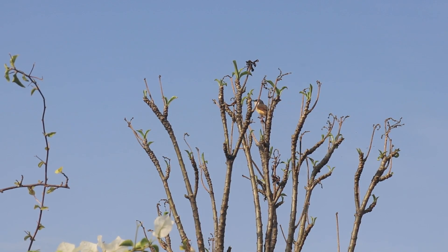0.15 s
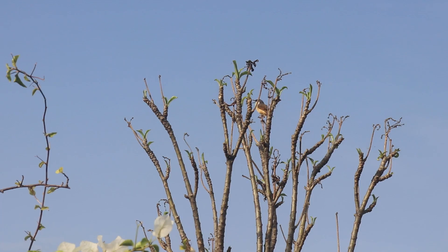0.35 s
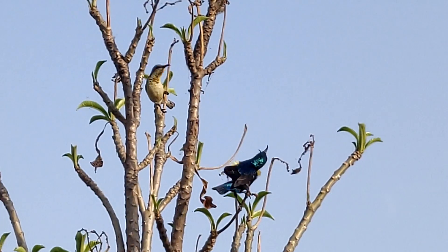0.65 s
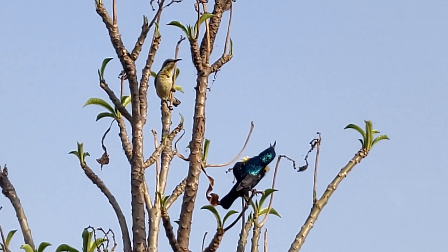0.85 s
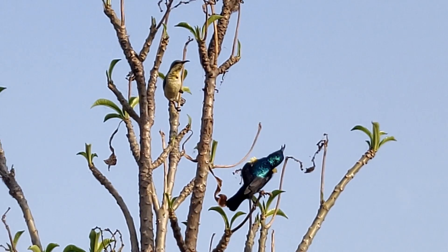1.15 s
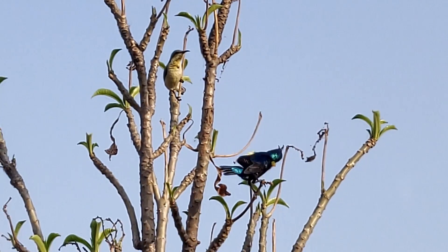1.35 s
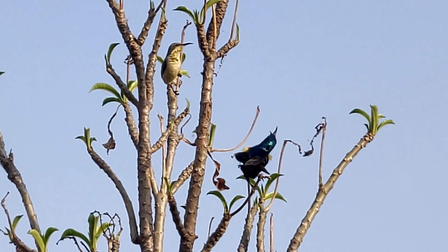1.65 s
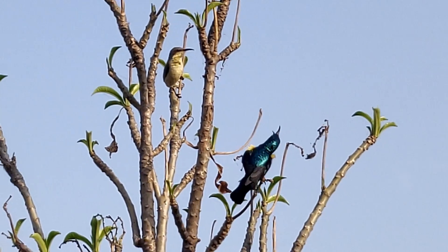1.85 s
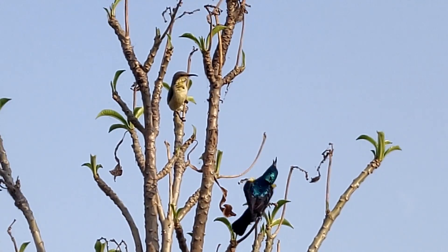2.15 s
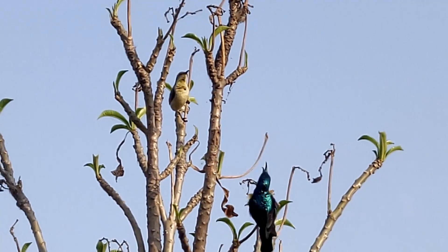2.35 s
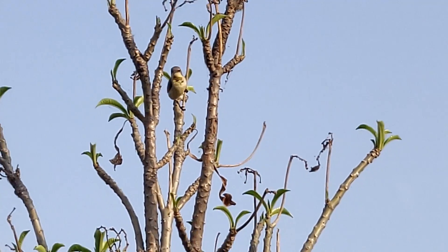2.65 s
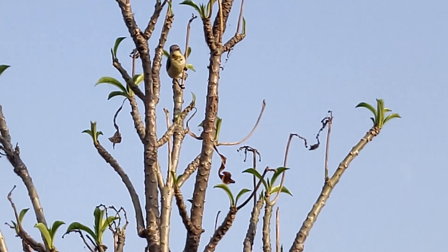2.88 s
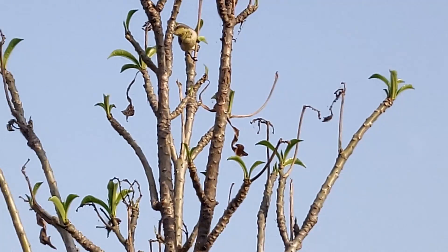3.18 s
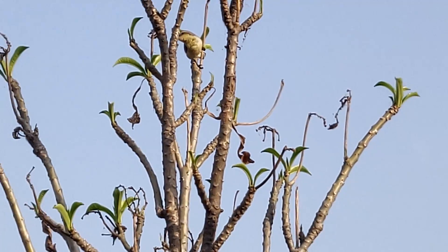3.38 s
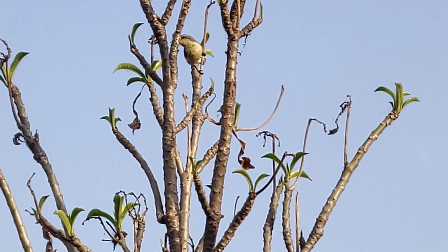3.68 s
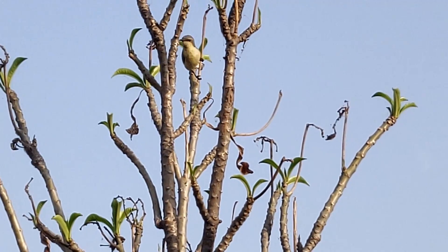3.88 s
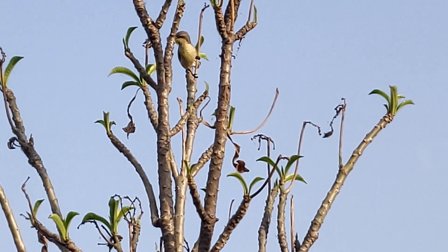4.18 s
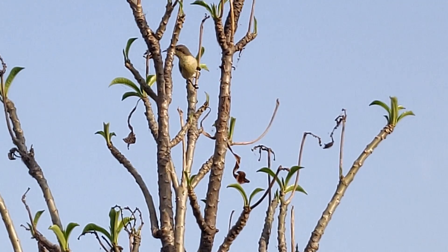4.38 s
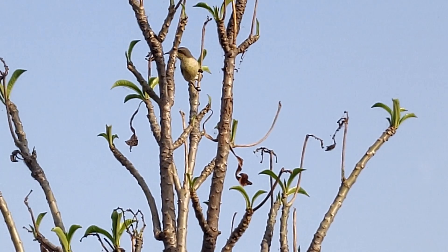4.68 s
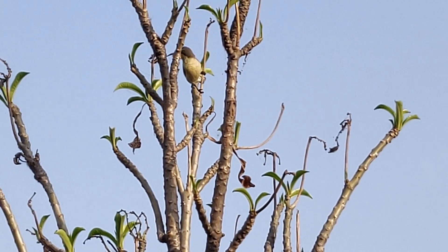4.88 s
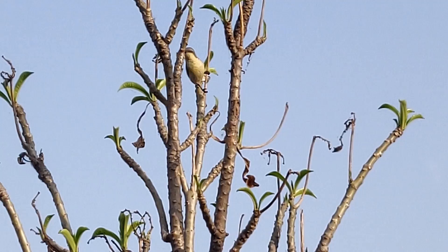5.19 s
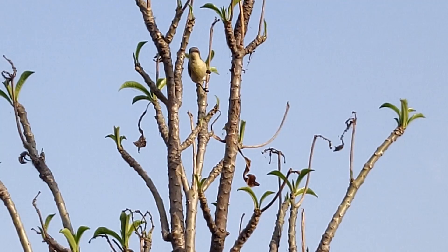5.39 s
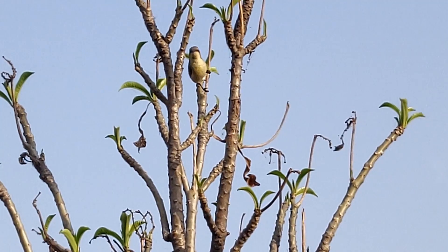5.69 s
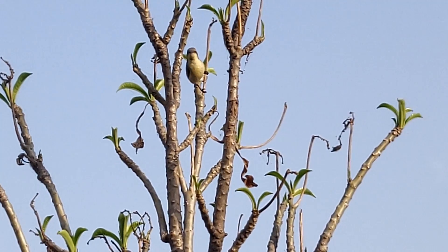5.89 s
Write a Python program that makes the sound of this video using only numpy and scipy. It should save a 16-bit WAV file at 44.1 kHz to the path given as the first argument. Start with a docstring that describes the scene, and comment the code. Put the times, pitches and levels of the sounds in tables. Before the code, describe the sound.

Outdoor garden birdsong: quick high chirps, slurs and buzzy trills up close, a faint distant passage with a brief rustle, then close phrases again.

```python
"""Sunbirds sing in a garden. Close by, stepped phrases start first, then slowing runs of ticks, slurs, chips and trills.
From about 2.5 s the song comes from further off to the left, and near 3.7 s something rustles briefly.
From 4.9 s stepped phrases return close by. Each note is one gliding whistle, thrown back by walls and foliage.
Under it all a distant engine hums, wind rumbles on the microphone, traffic drones and leaves hiss: all shaped
noise, except the engine, which is a stack of tones."""
import sys
import numpy as np
from scipy import signal
from scipy.fft import rfft, irfft, next_fast_len
from scipy.io import wavfile
from scipy.ndimage import uniform_filter1d, minimum_filter1d

SR = 44100
rng = np.random.default_rng(int(sys.argv[2]) if len(sys.argv) > 2 else 0)


def file_out(sig):
    """Save sig as 16-bit WAV at sys.argv[1]."""
    # one column per channel
    cols = np.atleast_2d(sig).T
    # limit, then scale
    lim = np.clip(cols, -1, 1)
    pcm = np.round(lim * 32767).astype(np.int16)
    wavfile.write(sys.argv[1], SR, pcm)


N = 266099
TIME = np.arange(N) / SR  # seconds


def undb(db):
    """Turn decibels into gain."""
    return 10 ** (np.asarray(db) / 20)


def curves(table, t):
    """Join each column of a table by straight lines over the times t."""
    s, *columns = np.transpose(table)
    return [np.interp(t, np.sort(s), c) for c in columns]


def colour(x, points):
    """Make some pitches louder and others softer, following (Hz, dB) points on a log-frequency axis."""
    size = next_fast_len(x.shape[-1])
    hz, db = np.transpose(points)
    f = np.maximum(np.arange(size // 2 + 1) * SR / size, 1)
    gain = undb(np.interp(np.log(f), np.log(hz), db))
    return irfft(rfft(x, size) * gain, size)[..., :x.shape[-1]]


def walk(rate, count):
    """Wander slowly by chance: random levels, each held 1 / rate seconds, then smoothed twice."""
    hold = max(int(SR / rate), 1)
    held = np.repeat(rng.standard_normal(count // hold + 1), hold)
    smooth = uniform_filter1d(uniform_filter1d(held, hold), hold)
    return smooth[:count] * np.sqrt(2)


def noise(points, likeness):
    """Make coloured stereo noise of rms 1; likeness is the correlation of left and right."""
    mid, side = colour(rng.standard_normal((2, N)), points)
    c = np.clip(likeness, -1, 1)
    pair = np.sqrt(1 + c) * mid + np.sqrt(1 - c) * np.array([side, -side])
    return pair / pair.std()


# Steady background layers, by name. Each: level at 0 s in dB, growth in dB per s,
# dB lower before the background fades in.
BACKGROUND_LEVELS = {"wind": (-40, .35, 28.7), "hiss": (-47.5, 0.335, 12), "drone": (-51, 0.858, 2.5)}
FADE_IN_S, FADE_IN_WIDTH_S = 0.261, 0.042  # middle of the fade-in, and how gradual it is


def bed_db(name):
    """Level of a background layer: hushed at first, then faded in and slowly growing."""
    db, db_per_s, hush_db = BACKGROUND_LEVELS[name]
    hush = (1 - np.tanh((TIME - FADE_IN_S) / FADE_IN_WIDTH_S)) / 2
    return db + db_per_s * TIME - hush_db * hush


# Tone of the wind on the microphone. Each row: frequency in Hz, level in dB.
WIND_COLOUR = [(12, -4), (22, 2), (45, -4), (70, -5.5), (110, -17), (200, -24.5), (400, -36.5), (900, -72)]
# Gusts on the microphone. Each row: centre in seconds, half length in seconds, boost in dB.
WIND_GUSTS = [(3.1, .3, 0.5), (4.3, 0.2625, 3), (5.88, 0.28, 8.5)]
# Tone of the far murmur. Each row: frequency in Hz, level in dB.
MURMUR_COLOUR = [(180, -41), (300, -7.5), (328, -2.5), (366, -8), (464, -3.5), (689, -2), (754, -1),
                 (892, -5.5), (1080, -7), (1370, -6), (1700, -0.5), (1970, -7), (2450, -6), (2990, -15),
                 (3200, -23), (4160, -43.5), (7040, -120)]
# How loud the murmur is. Each row: time in seconds, level in dB.
MURMUR_LOUDNESS = [(0, -58), (.5, -49.5), (2.45, -46), (3.3, -46.5), (5.2, -45.5), (6.03, -45)]
# Tone of the leaf hiss. Each row: frequency in Hz, level in dB.
LEAF_HISS_COLOUR = [(2000, -29), (3200, -6), (4200, -0.5), (5500, 1), (6400, 2.5), (7400, -9.5),
                    (8800, -15), (10000, -33), (13000, -31), (15500, -26)]
# Tone of the traffic drone. Each row: frequency in Hz, level in dB.
TRAFFIC_COLOUR = [(60, -21.5), (110, -1), (160, -0.5), (230, -7.5), (300, -10.5), (600, -13), (1200, -44.5)]


def outdoors(buffet_db=4.5, wind_pan_db=-3.0):
    """Low wind noise differs from side to side, traffic drones in the middle, murmur and leaf hiss lie all round."""
    gusts_db = sum(db * np.exp(-((TIME - s) / half_s) ** 2) for s, half_s, db in WIND_GUSTS)
    wind_db = bed_db("wind") + gusts_db + buffet_db * walk(12, N)
    wind = noise(WIND_COLOUR, 0.16) * undb(wind_db) * undb([[wind_pan_db], [-wind_pan_db]])
    murmur_db, = curves(MURMUR_LOUDNESS, TIME)
    murmur = noise(MURMUR_COLOUR, 0.037) * undb(murmur_db + 1.03 * walk(10, N))
    hiss = noise(LEAF_HISS_COLOUR, 0) * undb(bed_db("hiss") + 2.1 * walk(8.02, N))
    drone = noise(TRAFFIC_COLOUR, 0.937) * undb(bed_db("drone") + 1.125 * walk(15, N))
    return wind + murmur + hiss + drone


# Speed of the engine. Each row: time in seconds, cycle rate in Hz.
ENGINE_CYCLES = [(0, 18.05), (2.2, 21.27), (3.8, 21.14), (4.45, 16.9), (6.03, 16.3)]
# Loudness of the engine. Each row: time in seconds, level in dB, firing tone above the rest in dB.
ENGINE_LOUDNESS = [(0, -69, 4.5), (1.2, -56, 10.5), (2.1, -59.5, 8), (2.45, -49.5, 11.5), (3.3, -51.5, 5),
                   (3.75, -53.5, 13.5), (4.4, -47.5, 4), (6.03, -43.5, 3.5)]
# Tone of the exhaust. Each row: frequency in Hz, level in dB.
EXHAUST_COLOUR = [(60, -6.5), (85, 0.5), (135, 0.5), (165, -6), (200, -4.5), (228, -1.5), (260, -15),
                  (330, -19)]


def engine(waver=0.00547, swell_db=1.5, order=5, count=15):
    """A far engine: multiples of its cycle rate throb through the exhaust, with the firing tone on top."""
    hz, = curves(ENGINE_CYCLES, TIME)
    db, firing_db = curves(ENGINE_LOUDNESS, TIME)
    phase = 2 * np.pi * np.cumsum(hz * (1 + waver * walk(14, N))) / SR
    tones = 0
    for k in range(order - 1, count):
        tone_db = firing_db * (k == order) + swell_db * walk(12, N)
        tones = tones + undb(tone_db) * np.cos(k * phase + rng.uniform(0, np.pi))
    return undb(db) * colour(tones, EXHAUST_COLOUR)


def bursts(table):
    """Add up bursts that grow to a peak and die away exponentially."""
    total = 0
    for s, attack_s, decay_s, db in table:
        away = np.maximum((s - TIME) / attack_s, (TIME - s) / decay_s)
        total = total + undb(db) * np.exp(-away)
    return total


# Scrapes of the rustle. Each row: peak in seconds, attack in seconds, decay in seconds, level in dB.
SCRAPE_BURSTS = [(3.712, 0.00136, 0.0045, -35), (3.73, 0.015, 0.102, -41.5), (3.99, 0.103, 0.137, -38)]
# Tone of the scrapes. Each row: frequency in Hz, level in dB.
SCRAPE_TONE = [(300, 7.5), (600, 2.5), (1200, 0), (1800, 6.5), (2500, -3.5), (3500, -4.5), (9000, -16),
               (15000, -73)]
# The soft thud. Each row: peak in seconds, attack in seconds, decay in seconds, level in dB.
THUD_BURSTS = [(4.07, 0.093, 0.186, -39)]
# Tone of the thud. Each row: frequency in Hz, level in dB.
THUD_TONE = [(100, -10), (200, -0.5), (300, 11.5), (450, -6.5), (900, -7.5), (2000, -44.5)]


def rustle(flicker_db=3):
    """A fluttering scrape of noise starts abruptly and ends in a soft, lower thud."""
    scrape = noise(SCRAPE_TONE, 0.037) * bursts(SCRAPE_BURSTS) * undb(flicker_db * walk(70, N))
    thud = noise(THUD_TONE, 0.736) * bursts(THUD_BURSTS) * undb(flicker_db * walk(40, N))
    return scrape + thud


def scatter(t60, start_s):
    """A dying cloud of reflections with unit energy, different on each side; it falls 60 dB in t60 seconds."""
    age = np.arange(SR) / SR - start_s
    cloud = rng.standard_normal((2, SR)) * (age > 0) * np.exp(-np.log(1000) * np.abs(age) / t60)
    return cloud / np.sqrt(np.sum(cloud ** 2, axis=1, keepdims=True))


# Reflections from walls and boughs. Each row: delay in seconds, then left and right level in dB,
# before the echo level of the place is added.
WALL_ECHOES = [(.0029, -8, -9.5), (.0068, -13.5, -7), (0.0132, -15.5, -30.5), (.044, -8, -16.5)]
GARDEN_T60_S, FOLIAGE_T60_S = 0.54, 0.119


def garden(foliage_db, tail_db, echo_db, right_lag_s, left_wet_db=0.5, smear_s=0.022):
    """Stereo response: direct sound, a few smeared echoes, quick scatter from foliage and a longer tail."""
    foliage = undb(foliage_db) * scatter(FOLIAGE_T60_S, 0.0045)
    tail = undb(tail_db) * scatter(GARDEN_T60_S, 0.01)
    response = (foliage + tail) * undb([[left_wet_db], [-left_wet_db]])
    for delay_s, left_db, right_db in WALL_ECHOES:
        response += undb([[left_db + echo_db], [right_db + echo_db]]) * scatter(smear_s, delay_s)
    # the direct sound reaches one side a little later
    for channel, lag_s in enumerate((max(-right_lag_s, 0), max(right_lag_s, 0))):
        response[channel, int(lag_s * SR)] += 1
    return response


SECOND_DB, THIRD_DB = -42.5, -36  # overtones of the whistle, before the edge below
# Harder or softer edge of some notes, by name: overtone change in dB.
NOTE_EDGE = {"rise": -1, "steps": -15, "slur": -5, "chip": 1.5, "trill": 3.5, "tick": -2}


def whistle(hz, strength, kind, waver=0.00615, flutter_db=1.59, rasp=0.66):
    """One note: a nearly pure tone with a slight tremble, under faint raspy overtones."""
    count = len(hz)
    hz = uniform_filter1d(hz, size=40) * (1 + waver * walk(500, count))
    phase = 2 * np.pi * np.cumsum(hz) / SR
    rough = phase + rasp * walk(600, count)
    second = undb(SECOND_DB) * np.sin(phase + rough)
    third = undb(THIRD_DB) * np.sin(phase + 2 * rough)
    third = third * np.clip((SR / 2 - 3 * hz) / 2000, 0, 1)  # fades out before it is too high to sample
    tone = np.sin(phase) + undb(NOTE_EDGE.get(kind, 0)) * (second + third)
    to_nearest_end = np.minimum(np.arange(count), np.arange(count)[::-1]) / SR
    ends = np.minimum(to_nearest_end / 0.0011, 1)
    flutter = undb(flutter_db * walk(270.9, count))
    return np.sqrt(2) * tone * ends * uniform_filter1d(strength, size=55) * flutter


FADE_POWER = 0.3685  # steepness of the fall in level


def hump(u, peak, swell_power):
    """Level that swells from nothing to 1 at the share peak of a sound and dies away again."""
    peak = np.clip(peak, .05, .95)
    swell, fade = np.sin(np.pi / 2 * np.minimum([u / peak, (1 - u) / (1 - peak)], 1))
    return swell ** swell_power * fade ** FADE_POWER


def progress(length_s):
    """Count from 0 to 1 over a length of time."""
    return np.linspace(0, 1, int(length_s * SR))


# Notes by name, one to three glides in a row, before a run's own length, pitch and level.
# Each row: length in seconds, from Hz, to Hz, bow at the middle in Hz, level in dB, loudest at (0-1).
NOTE_GLIDES = { "slur": [(.06, 3153, 4511, 470.6, -2, 0.65)], "chip": [(.029, 5400, 6970, 384.5, 0, 0.32),
               (.02, 6600, 4000, -650, -13.5, 0)], "tick": [(0.025, 4130, 4700, -61, -11, 0.65),
               (.013, 4926, 6950, 298, 0.5, 0.41), (0.0033, 6900, 4600, 2, 1, 0)],
               "flick": [(0.02, 5100, 6150, 200, 3, 0.52), (.017, 7300, 5500, -4.5, -2.5, 0.2)],
               "pip": [(.013, 5710, 6482, 0.012, 3, 0)], "lead": [(.028, 3740, 5402, 200, -3.5, 0.41)],
               "rise": [(.118, 4106, 5707, -110, -5, 0.83)], "soar": [(.11, 3878, 6120, -130, 0, 0.69)],
               "sweep": [(.085, 3978, 5185, 109, -0.5, 0.99)], "dip": [(.065, 4750, 3700, -220, -2, 0.08),
               (.075, 3700, 5100, -200, -2.5, 0.37), (.09, 5017, 5350, 180.5, 3, .08)],
               "fall": [(.21, 5047, 4183, -30.5, 5.5, 0)], }
SWELL_POWER = 1.057  # steepness of a glide's rise in level


def glides(kind, length):
    """Pitch and strength of a note made of bowed glides."""
    parts = []
    for length_s, from_hz, to_hz, bow_hz, db, peak in NOTE_GLIDES[kind]:
        u = progress(length_s * length)
        hz = from_hz + (to_hz - from_hz) * u + bow_hz * (1 - (2 * u - 1) ** 2)
        parts.append([hz, undb(db) * hump(u, peak, SWELL_POWER)])
    return np.hstack(parts)


# a trill arches up to a crest and drops away (before a run's length and pitch factors)
TRILL_FROM_HZ, TRILL_CREST_HZ, TRILL_END_HZ = 5600, 7026, 3700
TRILL_RISE_S, TRILL_FALL_S, TRILL_DROP_POWER = .07, .042, 2.7
TRILL_ATTACK_S, TRILL_RELEASE_S = 0.02385, 0.01717
# a warble shakes it on the way up; WARBLE_RISE is the share of each shake spent rising
WARBLE_HZ, WARBLE_SWING_HZ, WARBLE_START_S, WARBLE_RISE = 82.24, 957, .0005, .22


def trill(length, throb_db=4.5):
    """Pitch and strength of a trill: pitch jumps up and slides back, less towards the crest, weaker in troughs."""
    total_s = TRILL_RISE_S + TRILL_FALL_S
    t = progress(total_s * length) * total_s
    below = np.maximum(1 - t / TRILL_RISE_S, 0)
    past = np.maximum(t - TRILL_RISE_S, 0) / TRILL_FALL_S
    climb = (TRILL_CREST_HZ - TRILL_FROM_HZ) * below
    drop = (TRILL_CREST_HZ - TRILL_END_HZ) * past ** TRILL_DROP_POWER
    arch = TRILL_CREST_HZ - climb - drop
    shake = signal.sawtooth(2 * np.pi * WARBLE_HZ * (t - WARBLE_START_S), np.clip(WARBLE_RISE, 0, 1))
    warble = np.sqrt(below) * shake
    ends = np.minimum(t / TRILL_ATTACK_S, 1) * np.minimum((total_s - t) / TRILL_RELEASE_S, 1) ** 2
    return arch + WARBLE_SWING_HZ * warble, ends * undb(throb_db * warble)


SLOWING = 1.023  # each gap in a run is this many times the last
NOTE_SCATTER = .006  # no two notes have quite the same pitch (share)


def run_of(s, kind, repeats, gap_s, length, pitch, first_db, last_db, pan_db):
    """One note repeated, slowing a little and changing evenly in level: (s, sound, pan dB) for each."""
    notes = []
    for k, db in enumerate(np.linspace(first_db, last_db, round(repeats))):
        hz, strength = trill(length) if kind == "trill" else glides(kind, length)
        hz = hz * pitch * (1 + NOTE_SCATTER * rng.standard_normal())
        notes.append((s, whistle(hz, strength * undb(db), kind), pan_db))
        s = s + gap_s * SLOWING ** k
    return notes


# Syllables of the stepped phrase, climbing and coming down. Each row: seconds from the phrase's start,
# length in seconds, pitch in Hz, sag at the end in Hz, level in dB added to the phrase's, loudest at (0-1).
PHRASE_SYLLABLES = [(.002, 0.0379, 3664, -110, -9, 0.71), (0.038, 0.0202, 4345, 542.5, -5, 0.78),
                    (0.061, 0.014, 4990, 601, -4.5, 0.69), (0.077, .021, 5468, 449, 2, 0.82),
                    (0.101, 0.0251, 4500, 647.5, 1, 0.33), (0.128, 0.037, 3943, 656.5, -2, 0.34)]
STEP_SAG_POWER, STEP_SWELL_POWER = 3, 2.125  # the syllables swell more suddenly than the glides
PHRASE_PAN_DB = -3.5  # left minus right


def stepped_phrase(s, db):
    """Short syllables up and down a ladder of pitches, each swelling and sagging: (s, sound, pan dB) for each."""
    notes = []
    for after_s, length_s, hz, sag_hz, step_db, peak in PHRASE_SYLLABLES:
        u = progress(length_s)
        strength = undb(db + step_db) * hump(u, peak, STEP_SWELL_POWER)
        sound = whistle(hz - sag_hz * u ** STEP_SAG_POWER, strength, "steps")
        notes.append((s + after_s, sound, PHRASE_PAN_DB))
    return notes


LEAD = SR // 4  # samples of room for notes that begin before 0 s


def song(runs, response):
    """Place runs of notes in time and let one place in the garden echo them."""
    out = np.zeros((2, LEAD + N + SR))
    for s, note, pan_db in sum(runs, []):
        start = max(LEAD + int(s * SR), 0)
        out[:, start:start + len(note)] += undb([[pan_db / 2], [-pan_db / 2]]) * note
    return signal.fftconvolve(out, response, axes=1)[:, LEAD:LEAD + N]


# Runs of one note from close by. Each row: start in seconds, note name, repeats, first gap in seconds,
# length factor, pitch factor, first level in dB, last level in dB, left minus right in dB.
CLOSE_RUNS = [ (0.124, "tick", 2, .097, 1, 1, -25, -18.5, -7),
              (.320, "tick", 2, 0.0979, 1, 1.0026, -12.5, -12, -6),
              (.511, "slur", 4, 0.1694, 1, 1.027, -19.5, -18, -2.5),
              (1.21, "slur", 1, 0, 1.06, 1.045, -17.5, -20, -1.5),
              (.599, "chip", 4, 0.1716, 1, 1.0417, -12, -11.5, -2),
              (1.325, "pip", 3, .19, 1.2, 1.076, -29, -17.5, -8.5),
              (1.347, "trill", 3, 0.19183, 1.03, 0.9978, -12.5, -15, -2.5),
              (1.513, "lead", 3, 0.22, 1, 1, -30, -25, -2),
              (1.926, "lead", 1, 0, 1.4, 0.926, -36, -30, 1.5),
              (1.931, "pip", 2, 0.019, 1.2, .99, -22.5, -25.5, -6.5),
              (1.973, "rise", 1, 0.033, 1.087, 1, -14.5, -16, -3)]
# Stepped phrases close by. Each row: start in seconds, level in dB.
STEPPED_PHRASES = [(-.18, -17.5), (.084, -18), (.356, -19), (4.906, -20), (5.172, -18.5), (5.433, -18.5),
                   (5.696, -18)]
# Runs from further off to the left. Each row: start in seconds, note name, repeats, first gap in seconds,
# length factor, pitch factor, first level in dB, last level in dB.
DISTANT_RUNS = [ (2.491, "fall", 1, 0, 0.91, 1.018, -58, -51),
                (2.87, "tick", 2, .452, .95, 0.875, -37.5, -49.5),
                (3.111, "dip", 1, 0, 0.91, 0.992, -47, -44.5),
                (3.418, "fall", 2, 0.082, .25, .94, -53.5, -59.5),
                (3.561, "lead", 1, 0.0091, 1.8, 1.17, -36.5, -38.5), (3.612, "soar", 1, 0, 1, 1, -32, -38),
                (3.796, "lead", 2, .197, 2.6, 1.1, -34, -32),
                (3.82, "trill", 2, .199, 1.02, 0.969, -29.5, -29.5),
                (4.176, "flick", 2, 0.1691, 1, 1, -31, -31),
                (4.224, "sweep", 2, 0.163, 0.89, 0.992, -30, -29),
                (4.528, "tick", 2, 0.1068, 1, 0.946, -33.5, -30),
                (4.75, "tick", 1, 0.098, 1, 0.892, -35, -33)]
FAR_PAN_DB = 2.5  # left minus right
# How the left side hears the birds. Each row: frequency in Hz, level in dB.
LEFT_HEARING = [(3000, -7), (4500, 2.5), (5400, 1), (6300, 8), (7200, -4), (8500, 16.5), (11000, -15.5),
                (13500, -1.5), (16000, -3.5)]
# How the right side hears the birds. Each row: frequency in Hz, level in dB.
RIGHT_HEARING = [(3000, -6.5), (4500, -1.5), (5400, -6.5), (6300, -13), (7200, -5.5), (8500, 22.5),
                 (11000, -8.5), (13500, -5.5), (16000, 9)]


def birds():
    """Near and far song; the far one has a stronger tail and echoes and reaches the left side first."""
    close = garden(foliage_db=-4, tail_db=-10, echo_db=-5.0, right_lag_s=-.00003)
    distant = garden(foliage_db=-8.5, tail_db=-5, echo_db=-1.5, right_lag_s=.00048)
    close_runs = [run_of(*row) for row in CLOSE_RUNS]
    phrases = [stepped_phrase(*row) for row in STEPPED_PHRASES]
    near = song(close_runs + phrases, close)
    far = song([run_of(*row, FAR_PAN_DB) for row in DISTANT_RUNS], distant)
    left, right = near + far
    return np.array([colour(left, LEFT_HEARING), colour(right, RIGHT_HEARING)])


def scene():
    """Birds over the garden's background."""
    return outdoors() + engine() + rustle() + birds()


TOP_HZ = 15800  # nearly nothing is left above this


def record(dry):
    """A quick limiter holds the loudest peaks at full scale, then the top is cut steeply."""
    room = 1 / np.maximum(np.abs(dry), 1)
    gain = uniform_filter1d(minimum_filter1d(room, size=129), size=129)
    top_cut = signal.ellip(8, .2, 75, TOP_HZ, fs=SR, output="sos")
    return signal.sosfilt(top_cut, dry * gain)


dry = scene()
out = record(dry)
file_out(out)
```